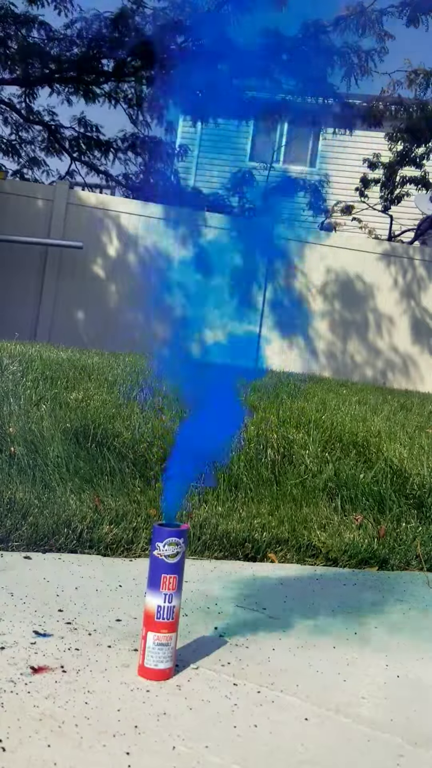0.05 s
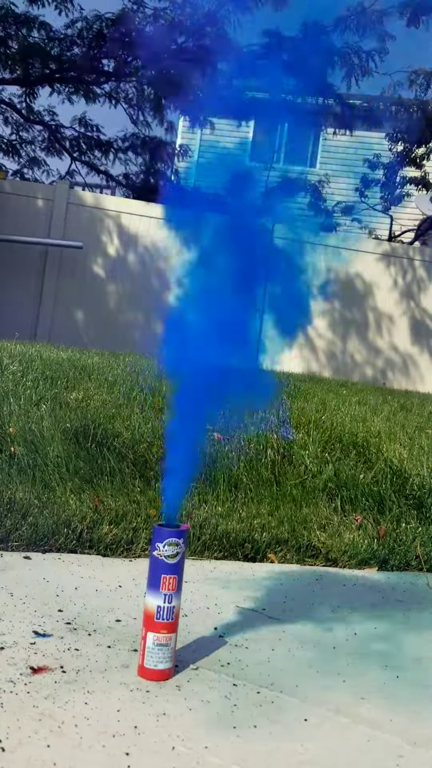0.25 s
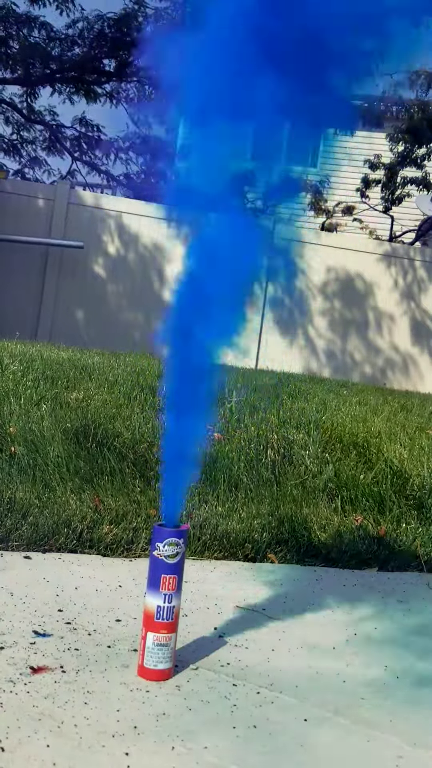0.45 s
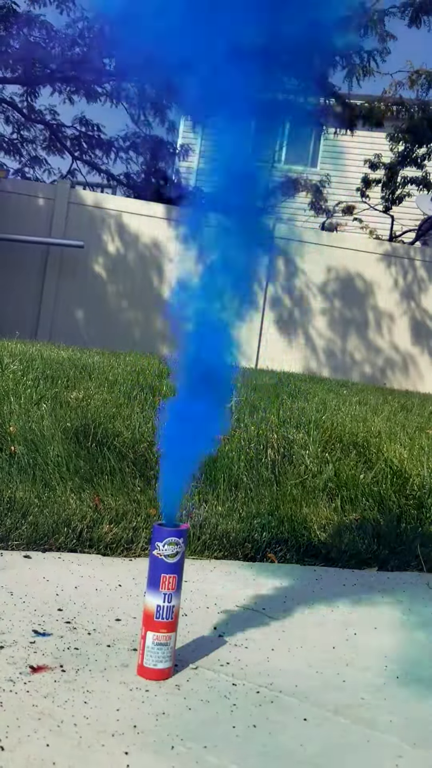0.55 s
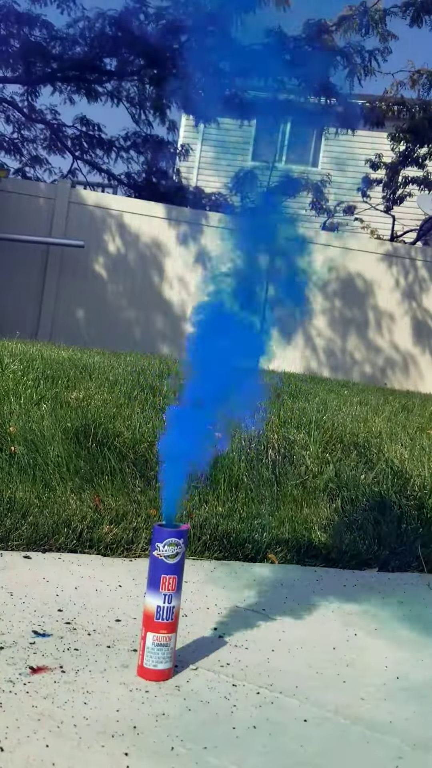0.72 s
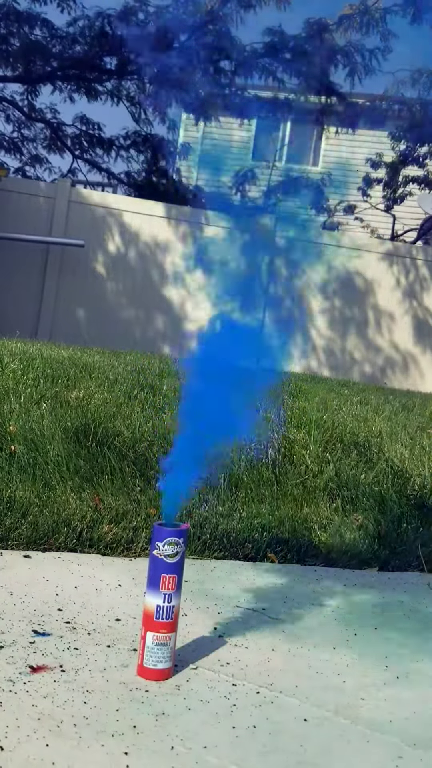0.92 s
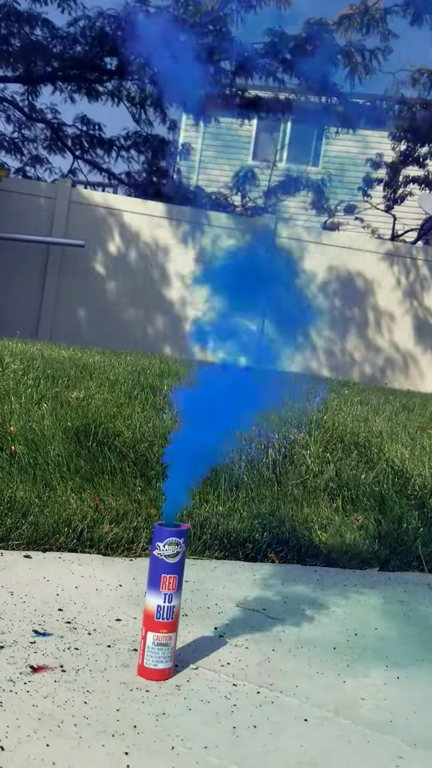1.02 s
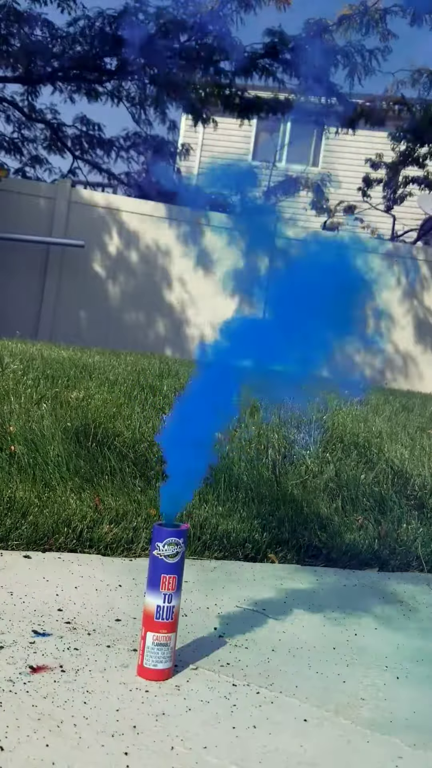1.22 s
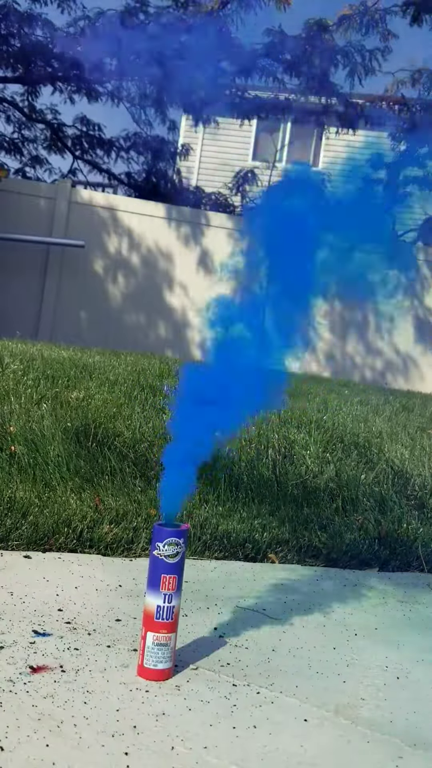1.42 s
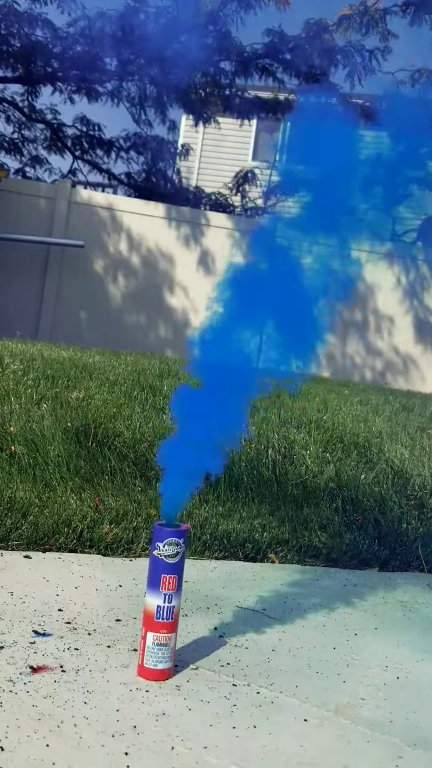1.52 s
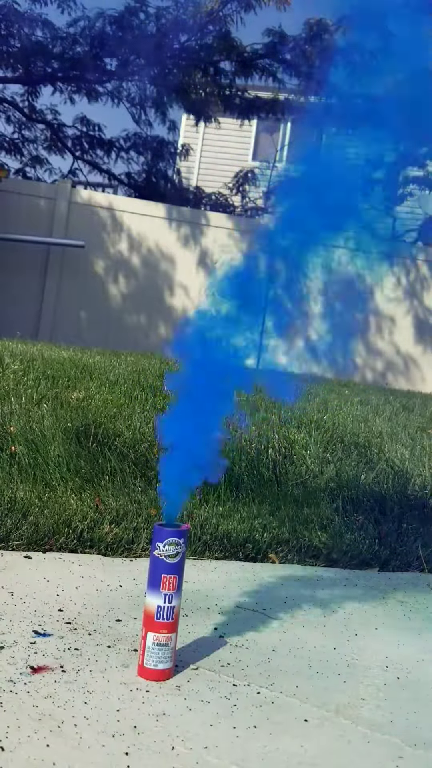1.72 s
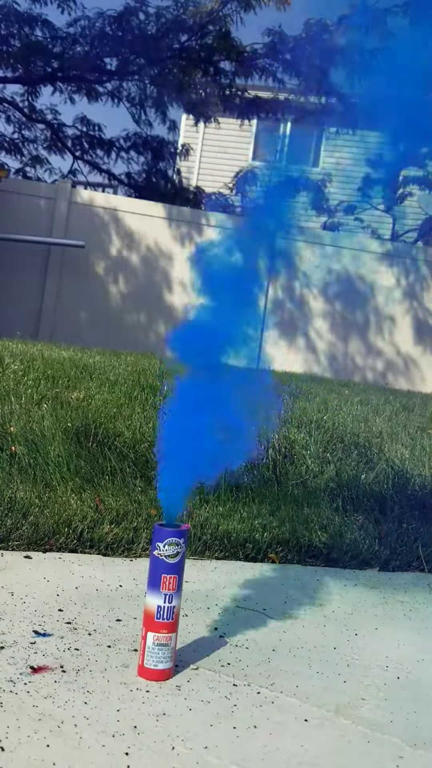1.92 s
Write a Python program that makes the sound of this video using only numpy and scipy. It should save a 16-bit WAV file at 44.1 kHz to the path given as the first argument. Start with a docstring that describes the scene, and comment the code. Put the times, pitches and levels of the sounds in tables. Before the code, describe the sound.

Smoke jets from a canister with a brief sputtering burst and a soft, steady rush.

```python
"""A smoke canister on concrete outdoors vents a turbulent jet, a soft steady rush, while a light
breeze rumbles on the two ports of a nearby microphone. After a fifth of a second the jet flares in
quick sputtering spurts with low whumps of gas, then dies back in a thinning hiss. The burning charge
ticks twice near 0.9 s, and a gust bumps the microphone. A late tick at 1.7 s is followed by a faint
sizzle, a softer bump and a tiny rattling clink."""
import sys
import numpy as np
from scipy.fft import rfft, irfft, next_fast_len
from scipy.io import wavfile
from scipy.ndimage import map_coordinates

SR = 44100
rng = np.random.default_rng(int(sys.argv[2]) if len(sys.argv) > 2 else 0)


def dump(signal):
    """Clip the signal to [-1, 1] and save it as 16-bit WAV at the path in sys.argv[1]."""
    limited = np.clip(np.atleast_2d(signal).T, -1, 1)
    pcm = np.round(limited * 32767).astype(np.int16)
    wavfile.write(sys.argv[1], SR, pcm)


N = 85995
TIME_S = np.arange(N) / SR


def amp(db):
    """Decibels to amplitude ratio."""
    return 10 ** (np.asarray(db) / 20)


def unit(x):
    """Normalisation to rms 1."""
    return x / np.sqrt(np.mean(x ** 2) + 1e-20)


def along(points, hz, column=1):
    """Interpolation of one table column on a log-frequency axis."""
    cols = np.transpose(points)
    return np.interp(np.log(hz + 1), np.log(cols[0] + 1), cols[column])


def curves(rows):
    """Piecewise-linear envelopes, one for each column after the time."""
    time_s, *cols = np.transpose(rows)
    return [np.interp(TIME_S, time_s, col) for col in cols]


def wobble(rate_hz):
    """Smooth random modulation: a spline through Gaussian knots."""
    knots = rng.standard_normal(int(N * rate_hz / SR) + 4)
    return map_coordinates(knots, [TIME_S * rate_hz])


def filtered(x, response):
    """Linear filtering: the spectrum times a complex frequency response."""
    size = next_fast_len(N + SR // 2)
    return irfft(rfft(x, size) * response(np.fft.rfftfreq(size, 1 / SR)), size)[..., :N]


def pulse(centre_s, pitch_hz, half_width_s):
    """A pressure pulse of a cycle or two: a cosine under a Gaussian window."""
    t = TIME_S - centre_s
    return np.cos(2 * np.pi * pitch_hz * t) * np.exp(-(t / half_width_s) ** 2)


# Colouring by canister, ground and microphone: frequency_hz, gain_db
PATH_COLOUR = [(650, -1), (830, -2.5), (1030, 3), (1220, 0.5), (1450, 1.5), (1850, 1.5), (2200, -7),
               (2450, 2.5), (2750, 6), (3050, 4), (3300, -3.5), (3650, 4.5), (4200, -0.5), (4550, -0.5),
               (4850, 3), (5130, 9.5), (5450, 6), (6000, 0.5), (6300, -1.5), (6600, 6.5), (6900, 5),
               (7130, -1), (7450, 0.5), (8500, 0.5), (9200, -9), (9900, -1.5), (10750, -7.5), (11500, -2.5),
               (12400, -2), (12950, -4.5), (13500, -1.5), (14300, -8)]
# The jet at the two ports: frequency_hz, left_over_right_db, left_lead_rad, coherence
PORT_RESPONSE = [(170.0, -1.0, -0.1, 0.97), (480.0, -3.0, -0.5, 0.96), (600.0, -7.0, -0.3, 0.82),
                 (700.0, -3.0, 0.3, 0.84), (850.0, 4.0, -0.3, 0.85), (1050.0, 0.0, -1.5, 0.93),
                 (1280.0, -12.0, -1.3, 0.49), (1420.0, -12.0, -0.4, 0.67), (1650.0, -9.0, -0.5, 0.8),
                 (1920.0, -12.0, 0.2, 0.22), (2250.0, 6.0, 3.1, 0.24), (2450.0, -1.0, 5.4, 0.8),
                 (2800.0, -2.0, 6.3, 0.91), (3250.0, -3.0, 8.3, 0.48), (3800.0, 3.0, 10.6, 0.64),
                 (4800.0, 1.0, 8.6, 0.65), (5700.0, -5.0, 10.1, 0.73), (6800.0, -7.0, 10.2, 0.59),
                 (8400.0, -14.0, 10.2, 0.28), (10200.0, 7.0, 13.1, 0.2), (12500.0, -8.0, 13.9, 0.18),
                 (14300.0, -6.0, 13.2, 0.31)]
def turbulence(spectrum, colour_share=np.ones_like):
    """Partial coherence: shared and independent noise reach two ports, apart in level and phase."""
    def coherence(hz):
        return along(PORT_RESPONSE, hz, column=3)

    def ports(hz):
        sides = np.array([[0.5], [-0.5]])
        balance = amp(sides * along(PORT_RESPONSE, hz))
        phase = np.exp(1j * sides * along(PORT_RESPONSE, hz, column=2))
        level_db = along(spectrum, hz) + colour_share(hz) * along(PATH_COLOUR, hz)
        return balance / np.linalg.norm(balance, axis=0) * phase * amp(level_db)

    shared = filtered(rng.standard_normal(N), lambda hz: np.sqrt(coherence(hz)))
    own = filtered(rng.standard_normal((2, N)), lambda hz: np.sqrt(1 - coherence(hz)))
    return unit(filtered(shared + own, ports))


# Envelopes of the steady outflow: time_s, rush_db, hiss_db
JET_LEVELS = [(0, -39.5, -48.5), (.12, -45.5, -47.5), (.22, -41, -50.5), (.55, -39, -55.5), (.8, -43, -73),
              (.9, -39, -67), (1.02, -40.5, -63.5), (1.25, -38.5, -66.5), (1.6, -40.5, -62),
              (1.95, -41, -63.5)]
# Its two spectra: frequency_hz, density_db
RUSH_SPECTRUM = [(60, -4.5), (150, -9), (182, 0), (225, -3), (340, -1.5), (480, -1.5), (650, -11),
                 (1100, -16), (1800, -21), (3300, -36.5), (7000, -42.5), (9500, -55.5), (14000, -39.5)]
HISS_SPECTRUM = [(400, -26), (1000, 6.5), (2800, 0), (3600, -6), (7000, -11), (9000, -26), (14000, -42)]
# How much path colour the rush takes on: frequency_hz, share
RUSH_COLOUR_SHARE = [(3000, 0.94), (3800, 0.38)]
def jet(rush_flutter_db=0.83, hiss_flutter_db=2.0):
    """Turbulent mixing radiates broadband noise: a fluttering low rush and a thin hiss."""
    rush_db, hiss_db = curves(JET_LEVELS)
    rush = turbulence(RUSH_SPECTRUM, colour_share=lambda hz: along(RUSH_COLOUR_SHARE, hz))
    rush *= amp(rush_db + rush_flutter_db * wobble(45.03))
    hiss = amp(hiss_db + hiss_flutter_db * wobble(31.75)) * turbulence(HISS_SPECTRUM)
    return rush + hiss


# Envelope of the wind noise: time_s, level_db
BREEZE_LEVELS = [(0, -59), (.07, -43), (.16, -44), (.22, -42), (.55, -57), (.65, -45), (.8, -55),
                 (.86, -41.5), (.92, -59), (.98, -43.5), (1.09, -50), (1.13, -39), (1.18, -49), (1.32, -58),
                 (1.44, -48), (1.55, -51), (1.74, -58), (1.8, -47), (1.86, -62), (1.95, -58)]
# Its spectrum: frequency_hz, density_db
RUMBLE_SPECTRUM = [(18, -63), (28, -34), (38, -18), (50, 11.5), (70, -7), (90, 2), (118, 1.5), (150, -16.5),
                   (400, -54), (2000, -88)]
def breeze(lumps_db=0.5, shared_db=-4):
    """Pressure fluctuations in moving air make a lumpy rumble, partly different at each port."""
    air = rng.standard_normal((2, N)) + amp(shared_db) * rng.standard_normal(N)
    rumble = filtered(air, lambda hz: amp(along(RUMBLE_SPECTRUM, hz)))
    level_db, = curves(BREEZE_LEVELS)
    return amp(level_db) * unit(amp(lumps_db * wobble(21)) * rumble)


# Envelopes of the flare beneath the spurts: time_s, roar_db, fizz_db
FLARE_LEVELS = [(.21, -55, -85), (.245, -36, -76), (.262, -28, -42), (.285, -31.5, -40.5),
                (.312, -36.5, -44), (.335, -38, -36.5), (.365, -35, -35.5), (.395, -38, -33.5),
                (.406, -37, -36.5), (.422, -34, -32.5), (.466, -31.5, -35), (.482, -41, -41),
                (.52, -36, -41), (.57, -41.5, -41), (.592, -60, -48), (.612, -50, -45.5),
                (.725, -67, -57.5), (.755, -71, -45), (.8, -53, -54.5), (.86, -75, -59.5), (.9, -72, -57.5),
                (1.03, -93, -77)]
# Spurts of gas: centre_s, roar_db, fizz_db, half_width_s, puff_db
GAS_SPURTS = [(0.245, -39, -62, 0.004, -24), (0.2735, -25, -27.5, 0.0034, -50),
              (0.301, -28, -26.5, 0.0041, -45), (0.327, -26, -30, 0.0042, -38),
              (0.3432, -23.5, -24, 0.0065, -17), (0.3878, -22.5, -28.5, 0.0071, -16),
              (0.4293, -22.5, -34, 0.0058, -18.5), (0.454, -30.5, -41, 0.0063, -22.5),
              (0.524, -43, -46, 0.0038, -31), (0.567, -41, -44, 0.0044, -34.5),
              (0.755, -57, -58, 0.0023, -34), (0.847, -61, -53, 0.0053, -46)]
# Low, middle and high noise of the burst: frequency_hz, density_db
ROAR_SPECTRUM = [(30, -15), (58, -2), (110, 0.5), (160, 1.5), (230, 1), (330, -1), (500, -3.5), (750, -12),
                 (1050, -11.5), (1800, -16), (3000, -21), (6000, -29.5), (14000, -37)]
RASP_SPECTRUM = [(400, -29), (700, 4), (1100, -3), (1900, 1), (2800, -3.5), (5000, -24)]
FIZZ_SPECTRUM = [(300, -43), (1200, -5), (3000, 5), (7000, 5.5), (10000, 1.5), (13500, 7.5), (15000, 7)]
def flare(sputter_db=1.23, grit_db=1.0, rasp_db=-8.5):
    """Incoherent noise adds in power: each spurt swells roar and fizz, with a rasp and a hollow puff."""
    roar_power, fizz_power = amp(curves(FLARE_LEVELS)) ** 2
    spurt_power, puffs = np.zeros((2, N))
    for centre_s, roar_db, fizz_db, half_width_s, puff_db in GAS_SPURTS:
        swell = np.exp(-np.abs((TIME_S - centre_s) / half_width_s) ** 1.26)
        spurt_power += amp(roar_db) ** 2 * swell
        fizz_power += amp(fizz_db) ** 2 * swell
        puffs += amp(puff_db) * pulse(centre_s, pitch_hz=320, half_width_s=0.003)
    roar = np.sqrt(roar_power + spurt_power) * turbulence(ROAR_SPECTRUM)
    rasp = amp(rasp_db) * np.sqrt(spurt_power) * turbulence(RASP_SPECTRUM)
    fizz = np.sqrt(fizz_power) * amp(grit_db * wobble(1100)) * turbulence(FIZZ_SPECTRUM)
    sputter = amp(sputter_db * wobble(170.4))
    return puffs + sputter * (roar + rasp + fizz)


# Low surges of gas in the flare: centre_s, peak_db
GAS_WHUMPS = [(0.28, -25), (0.349, -23), (.452, -26)]
def whumps(pitch_hz=58.7, half_width_s=0.013):
    """A sudden change of outflow radiates a low pressure pulse."""
    return sum(amp(peak_db) * pulse(centre_s, pitch_hz, half_width_s) for centre_s, peak_db in GAS_WHUMPS)


# Ticks of the burning charge: start_s, left_peak_db, tilt_db_per_octave, right_drop_db
CHARGE_TICKS = [(.9003, -17, -5, 29), (.9440, -42, -3, 6), (1.7056, -25, 1.5, 27)]
# Modes of a tick: pitch_hz, level_db, t60_s
SNAP_MODES = [(900, -16, 0.0024), (1690, -8.5, 0.0033), (3070, -4, 0.003), (5500, -1.5, 0.0028),
              (7700, -9, 0.002), (10060, -6.5, 0.0015), (13500, -5.5, 0.0022)]
def ticks():
    """Impulse response: each dry snap of the charge is a sum of heavily damped modes."""
    out = np.zeros((2, N + SR))
    t = np.arange(SR // 50) / SR
    for start_s, peak_db, tilt, right_drop_db in CHARGE_TICKS:
        snap = np.zeros(len(t))
        for k, (pitch_hz, level_db, t60_s) in enumerate(SNAP_MODES):
            decay = amp(level_db + tilt * np.log2(pitch_hz / 4000) - 60 * t / t60_s)
            snap += (-1) ** k * decay * np.sin(2 * np.pi * pitch_hz * t)
        port_gains = amp([[peak_db], [peak_db - right_drop_db]])
        start = round(start_s * SR)
        out[:, start:start + len(t)] -= port_gains * snap / np.abs(snap).max()
    return out[:, :N]


# Gusts on the microphone: centre_s, peak_db, pitch_hz
GUST_BUMPS = [(1.130, -34.5, 76), (1.797, -44, 50)]
def gusts(half_width_s=0.0099):
    """The dynamic pressure of a gust bumps both ports alike."""
    return sum(amp(peak_db) * pulse(centre_s, pitch_hz, half_width_s)
               for centre_s, peak_db, pitch_hz in GUST_BUMPS)


# Envelope of the sizzle after the late tick: time_s, level_db
SIZZLE_LEVELS = [(1.712, -82), (1.728, -65), (1.78, -80)]
# Its spectrum: frequency_hz, density_db
SIZZLE_SPECTRUM = [(7000, -28), (12000, 0)]
def sizzle(grit_db=3):
    """The charge frizzles briefly: fast amplitude modulation roughens high treble noise."""
    level_db = np.interp(TIME_S, *np.transpose(SIZZLE_LEVELS), left=-np.inf, right=-np.inf)
    return amp(level_db) * unit(amp(grit_db * wobble(900)) * turbulence(SIZZLE_SPECTRUM))


# A faint clink and its two rattles: start_s, level_db
CLINK_STRIKES = [(1.8828, -43.5), (1.889, -52), (1.896, -50)]
def clinks(pitch_hz=3070, t60_s=0.0078, right_db=-7):
    """Free decay of one damped mode, excited three times and louder at the left port."""
    ring = np.zeros(N)
    for start_s, level_db in CLINK_STRIKES:
        age_s = np.maximum(TIME_S - start_s, 0)
        ring += amp(level_db - 60 * age_s / t60_s) * np.sin(2 * np.pi * pitch_hz * age_s)
    return amp([[0], [right_db]]) * ring


def scene():
    """Superposition: the pressures from canister and wind add at each port."""
    return jet() + breeze() + flare() + whumps() + ticks() + gusts() + sizzle() + clinks()


def record(dry, low_cut_hz=40, top_hz=14700):
    """Band limiting: the microphone has a third-order bass roll-off and a sharp upper cutoff."""
    def response(hz):
        slope = (hz / low_cut_hz) ** 3
        return (hz < top_hz) * slope / np.hypot(1, slope)

    return filtered(dry, response)


dry = scene()
out = record(dry)
dump(out)
```